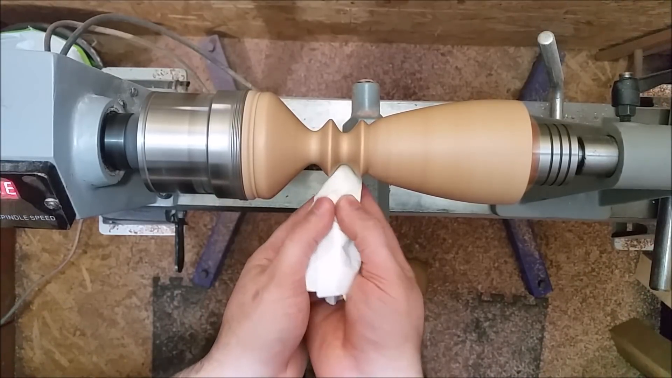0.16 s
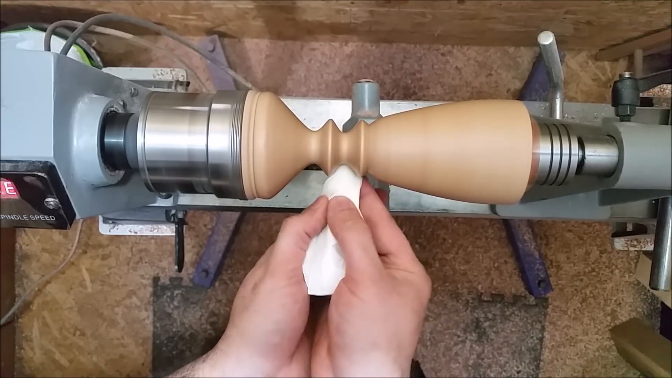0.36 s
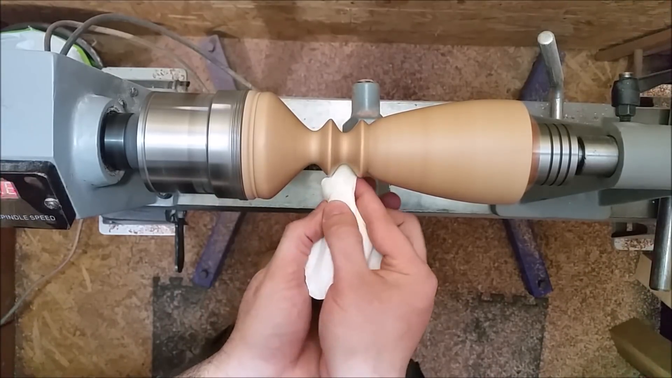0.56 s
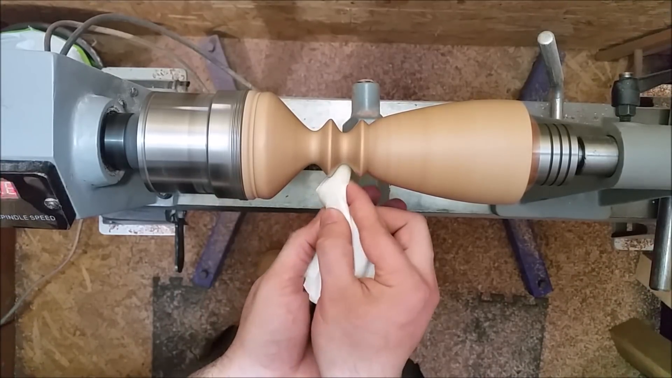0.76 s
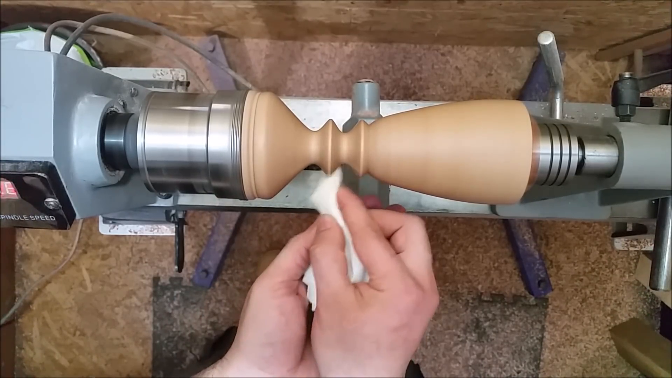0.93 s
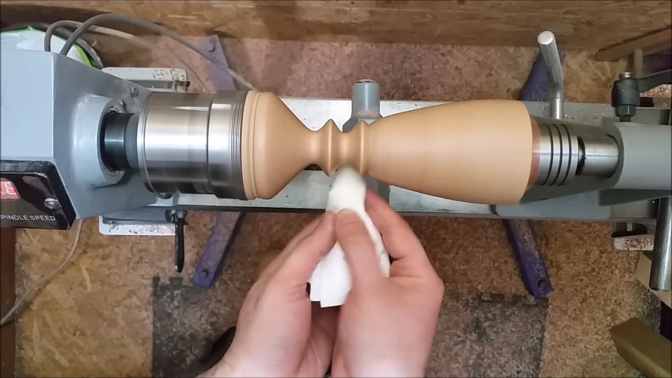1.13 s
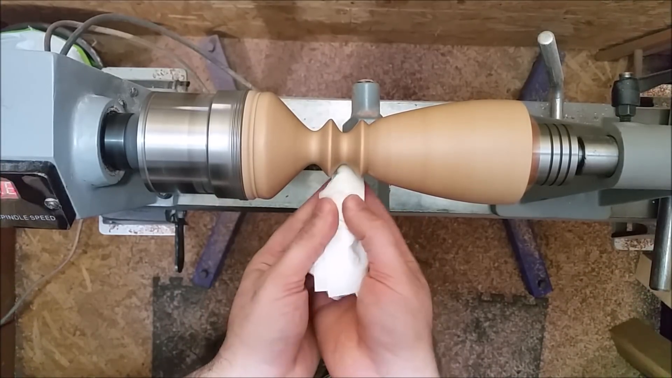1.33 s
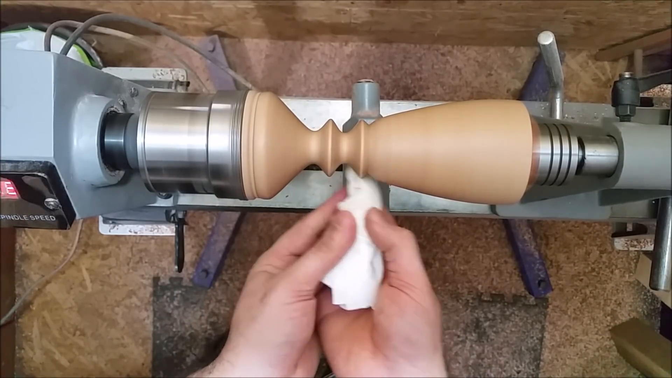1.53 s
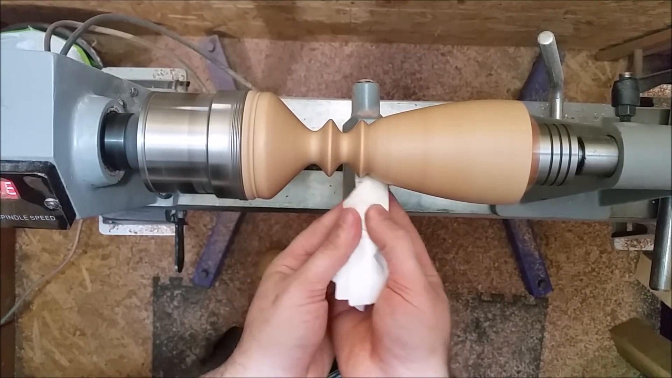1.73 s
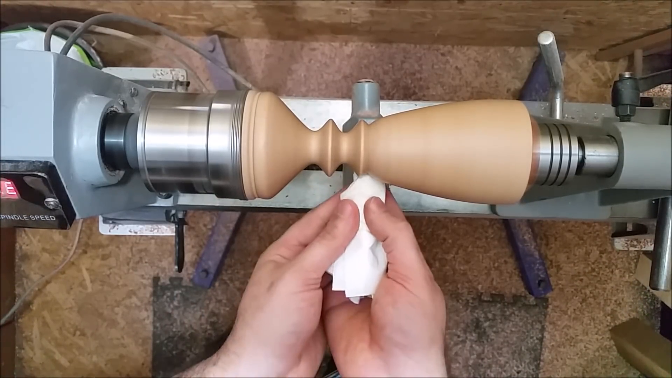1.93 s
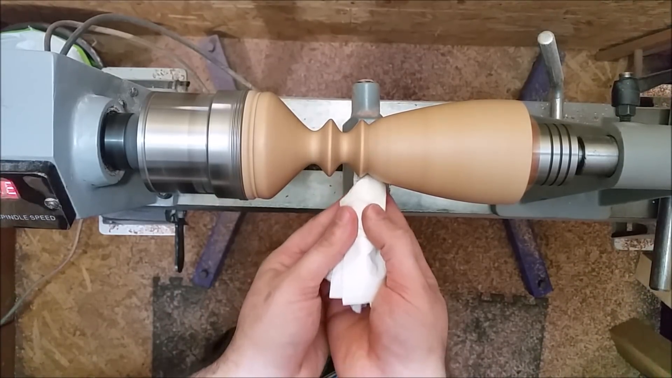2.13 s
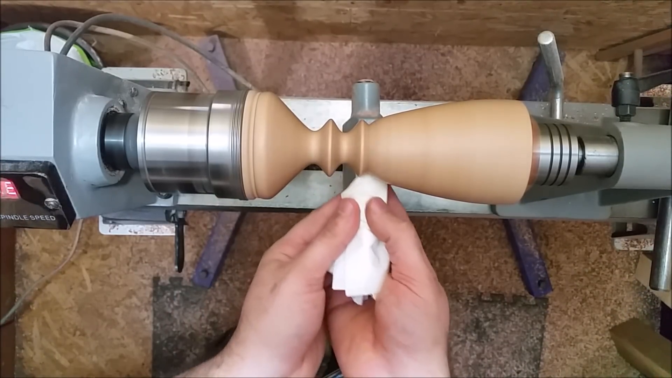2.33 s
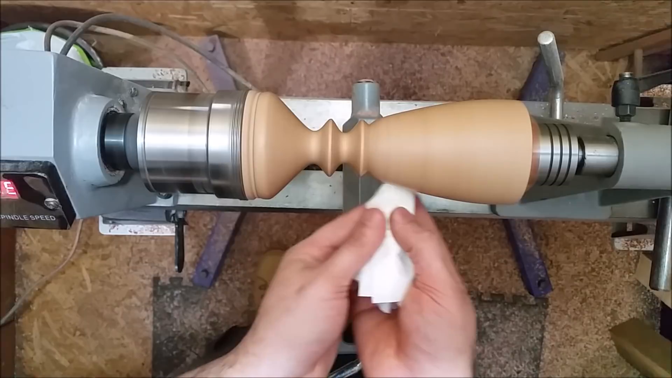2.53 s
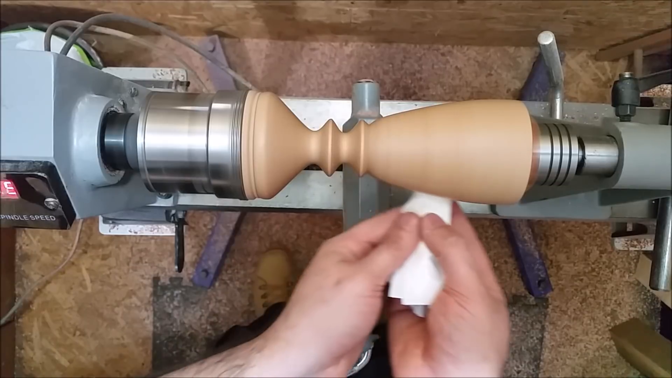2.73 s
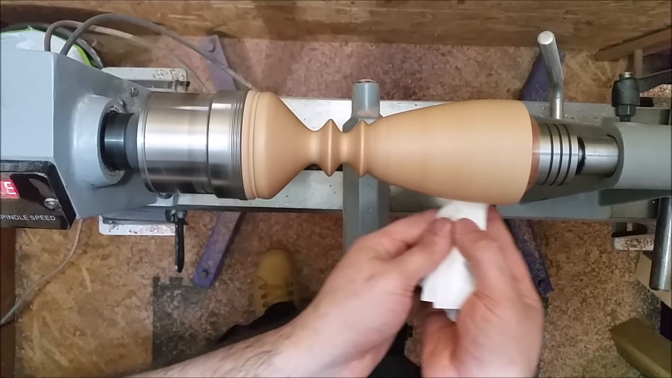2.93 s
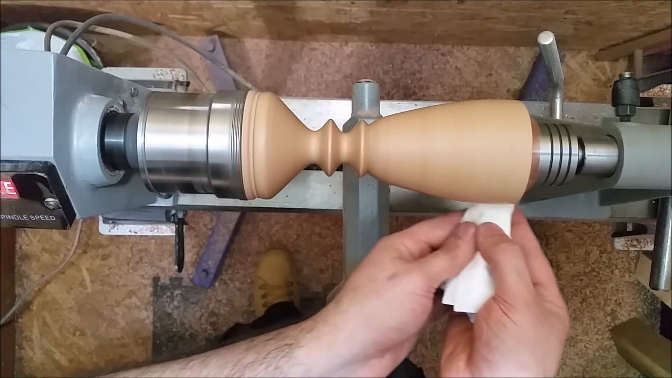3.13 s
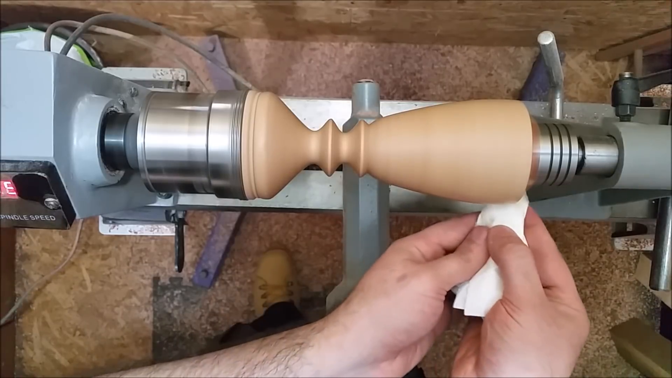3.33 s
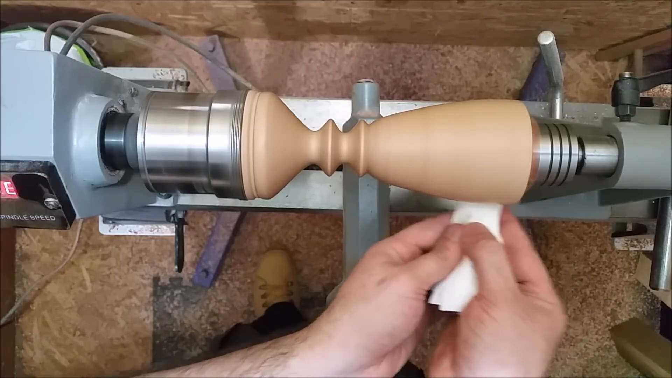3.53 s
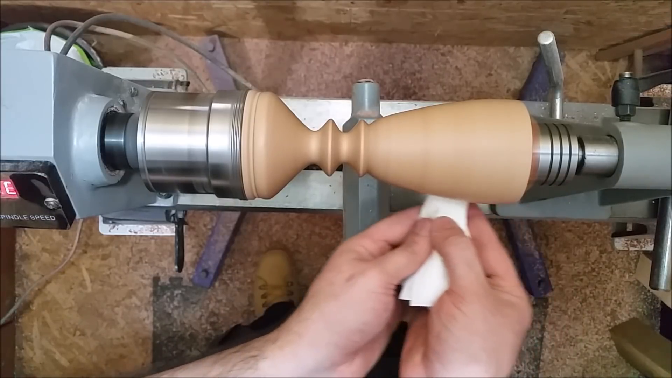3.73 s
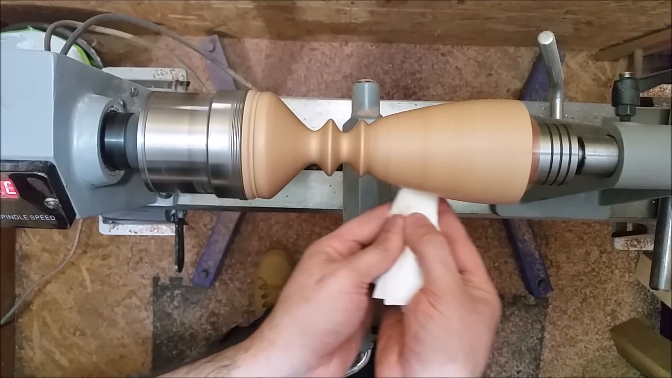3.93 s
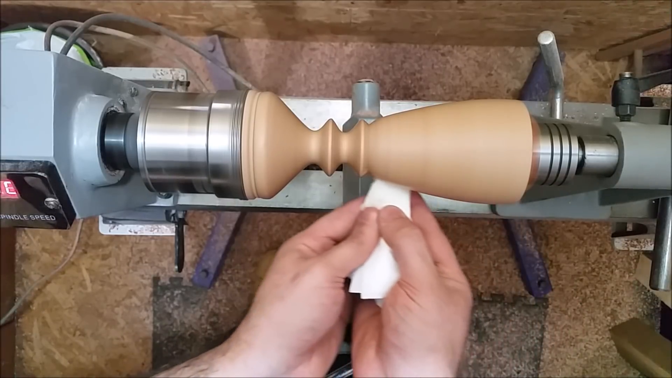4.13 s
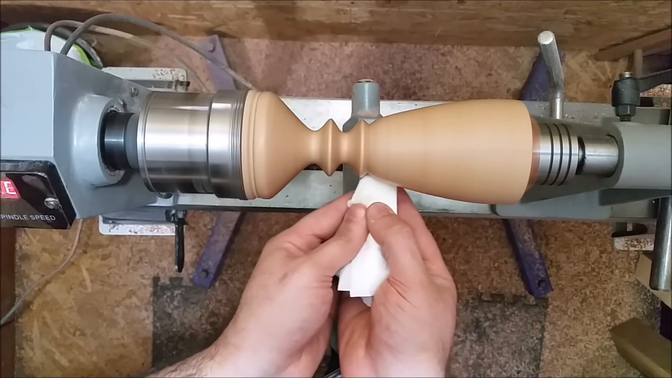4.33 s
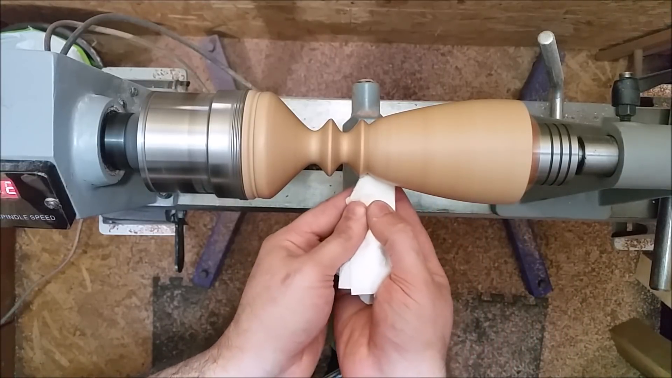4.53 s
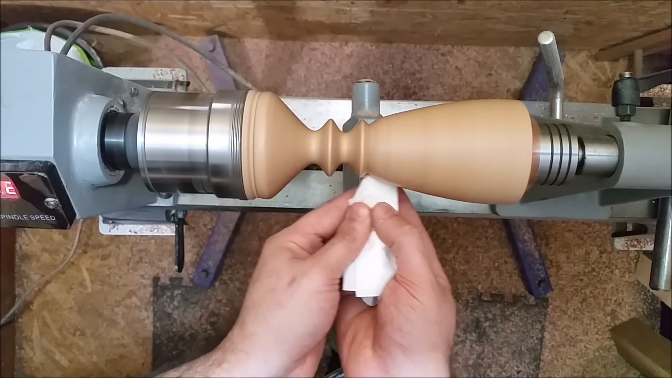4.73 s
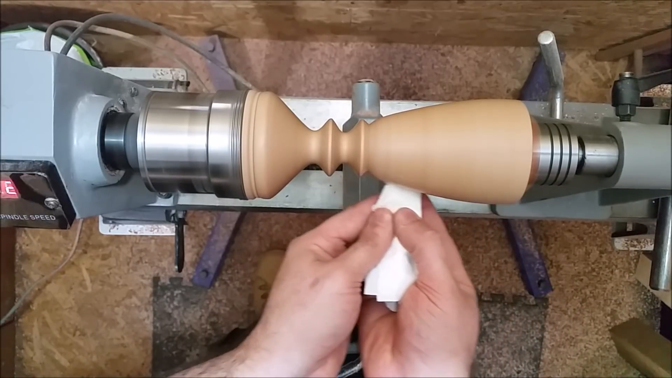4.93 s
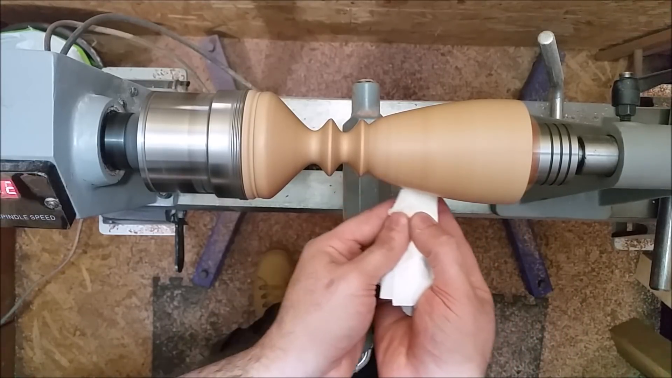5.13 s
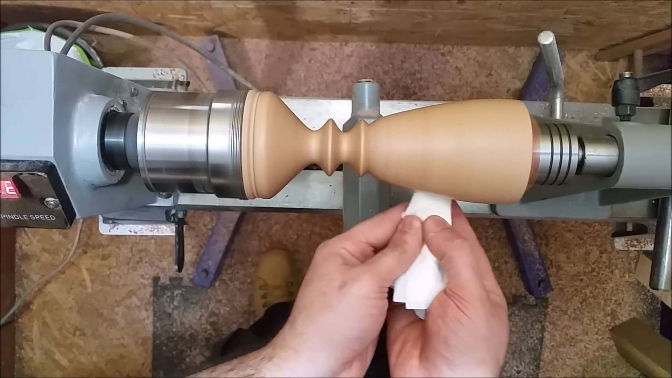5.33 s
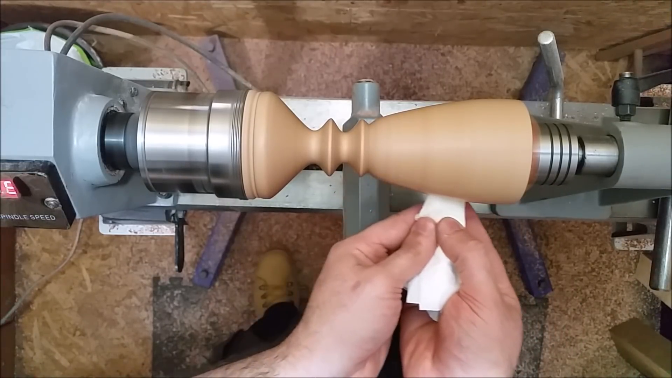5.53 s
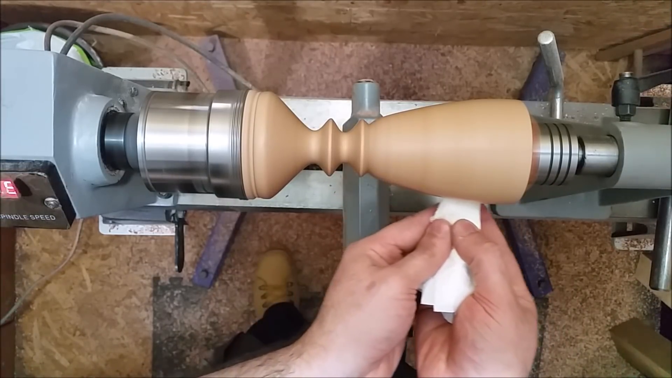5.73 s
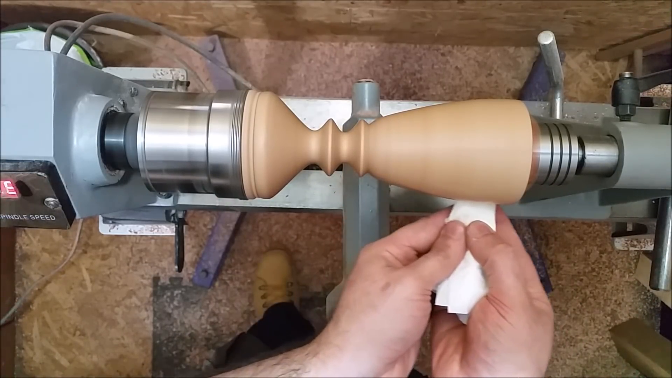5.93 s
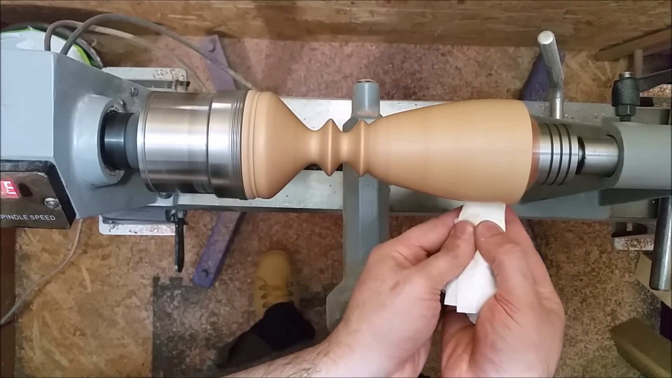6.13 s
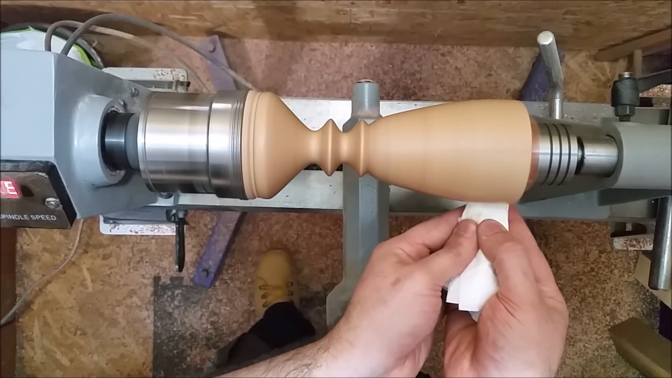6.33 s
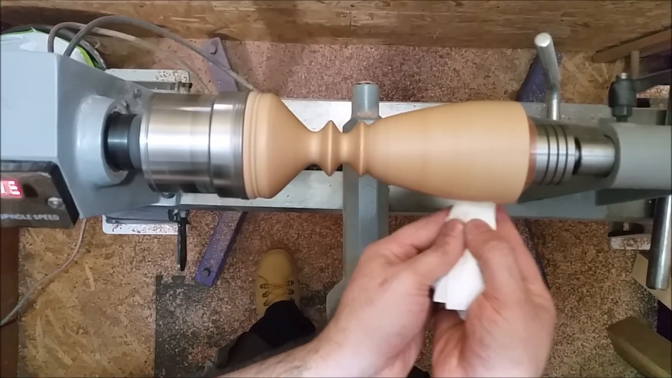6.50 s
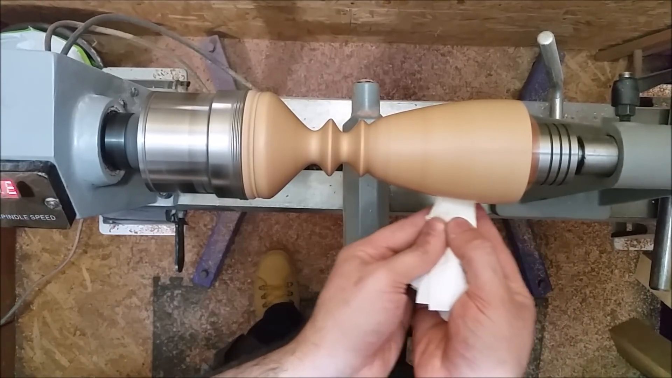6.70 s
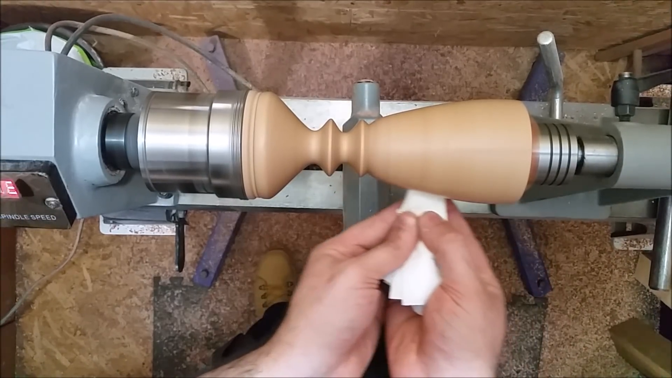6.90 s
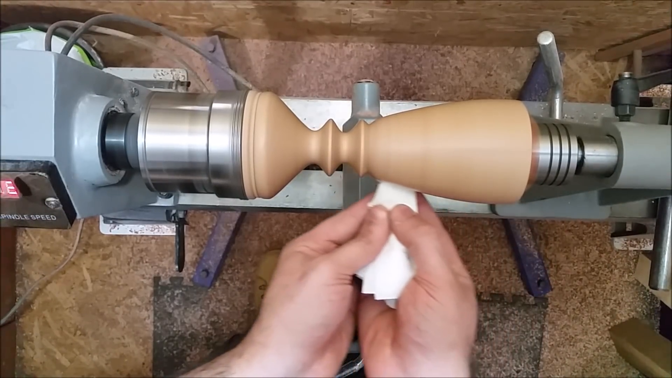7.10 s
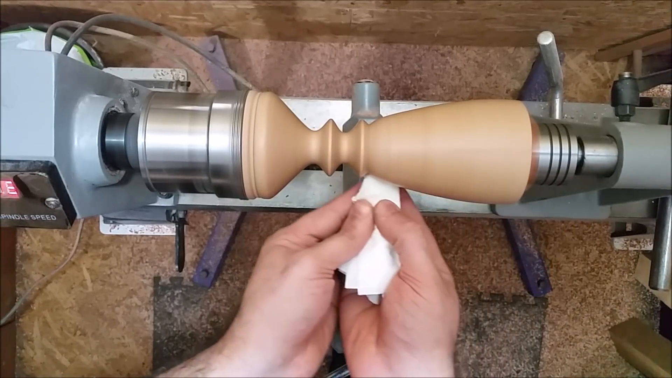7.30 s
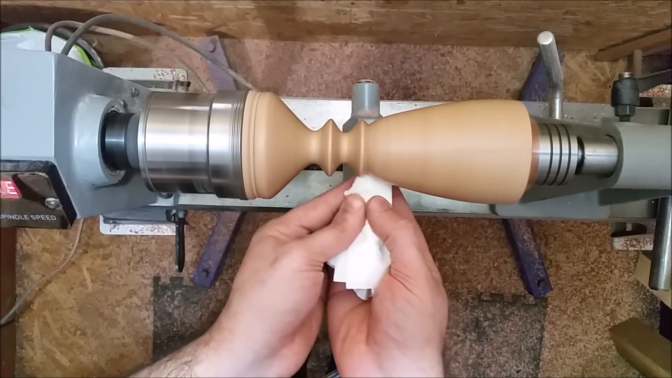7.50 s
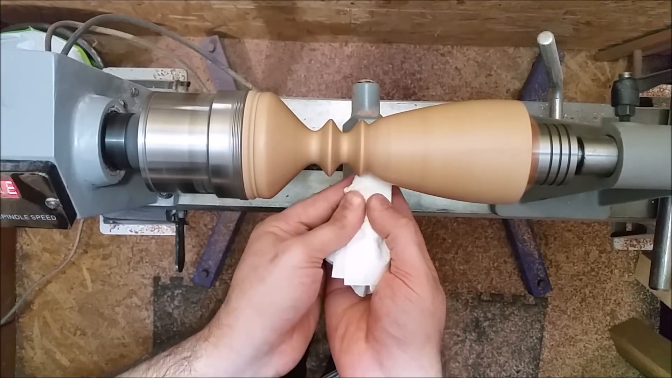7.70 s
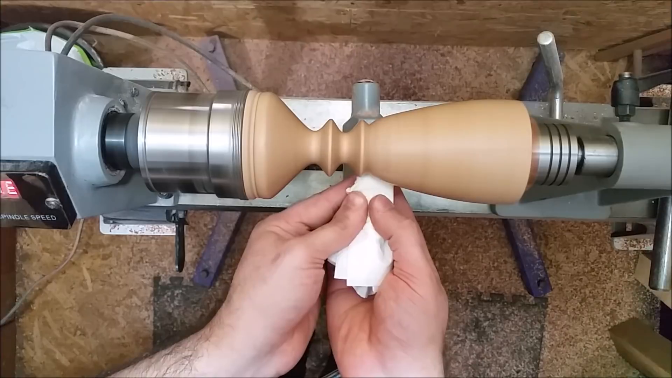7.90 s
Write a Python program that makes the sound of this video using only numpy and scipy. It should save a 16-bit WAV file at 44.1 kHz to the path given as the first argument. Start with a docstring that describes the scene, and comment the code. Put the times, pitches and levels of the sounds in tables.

```python
"""A wood lathe turns a vase in a small workshop while a paper towel is pressed against it.
Motor, spindle and belt are sums of wavering sines at their orders and combinations; load and chatter change
their levels. The inverter is a fixed whistle with sidebands, the bearings are whines over rumble.
The towel is coloured noise pulsing once per turn: rub, rasp, hiss and two brief scuffs.
Another motor coasts down faintly: three sinking sines."""
import sys
import numpy as np
from scipy import signal
from scipy.fft import rfft, irfft, next_fast_len
from scipy.io import wavfile

SR = 44100
rng = np.random.default_rng(int(sys.argv[2]) if len(sys.argv) > 2 else 0)


def wav_out(sig):
    """Save sig, one row per channel (or a flat mono array), as 16-bit PCM at SR to the path in sys.argv[1]."""
    wavfile.write(sys.argv[1], SR, np.round(np.clip(np.atleast_2d(sig).T, -1, 1) * 32767).astype(np.int16))


N = 351036

# sixth spindle order, the workpiece's drone: t/s, level/dB
DRONE_LEVEL = [(0, -39), (2.3, -34), (3, -26.5), (3.5, -22.5), (4.35, -33), (4.75, -27), (5.1, -33),
               (5.4, -26.5), (6, -27), (6.55, -20.5), (7.35, -31.5), (7.6, -26.5), (7.96, -27.5)]
# likeness of the two microphones: f/Hz, correlation (-1 to 1)
LIKENESS = [(30, .96), (90, .94), (180, .97), (330, .85), (600, .6), (1200, 0), (2400, -.35), (4500, .05),
            (6500, -.2), (9500, .1), (12500, -.3), (15000, -.2)]
# balance of the two microphones: f/Hz, left minus right/dB
BALANCE_DB = [(60, -1.5), (92, -4), (140, -2), (210, -0.5), (330, -6), (500, -2.5), (770, -2.5),
              (1170, -3.5), (1790, -4), (2740, -4.5), (4190, 4), (6410, 4), (9810, -5), (15000, 0.5)]


def drive(motor, spindle, load):
    """Motor and spindle orders and their sum and difference tones beat; the weaker ones throb with the belt."""
    # motor's third order: t/s, level/dB
    motor_hum = [(0, -27), (.5, -27), (1.3, -34.5), (2.1, -25.5), (2.8, -29), (3.5, -36.5), (4.15, -43.5),
                 (4.6, -28.5), (5, -30), (5.4, -42), (6, -63), (7.4, -29), (7.96, -34)]
    # other workpiece orders: spindle multiple (rounded for pitch), light/dB, loaded/dB, added by chatter/dB
    drone_orders = [(4, -58, -46.5, 14), (5, -66, -43.5, 6.5), (6.86, -51.5, -41, 4),
                    (7.65, -73, -47.5, 14), (9, -67, -68, 16), (10, -75, -53.5, 7), (11.1, -54.5, -59, 18),
                    (12, -76, -68, 11), (13, -73, -62.5, 11.5), (29, -79, -78, 15), (31, -86, -76, 13),
                    (60, -80, -75, 13.5)]
    # tones of the belt-coupled shafts: motor multiple, spindle multiple, light/dB, loaded/dB
    belt_tones = [(0, 1, -49, -52), (0, 3, -50, -58), (2, 0, -45, -45.5), (5, -2, -46.5, -53),
                  (6, -3, -49, -44.5), (3, 2, -39.5, -38.5), (6, -2, -44, -42), (5, 0, -41.5, -38),
                  (3, 3, -42, -42), (6, 0, -49, -46.5), (10, -3, -71, -62.5), (8, 0, -58, -55),
                  (9, 0, -64.5, -55.5), (10, -1, -61, -66), (12, 0, -65, -80), (0, 15, -70, -67),
                  (0, 16, -74, -64), (14, 0, -62.5, -60.5)]
    belt_laps_per_motor_turn = .087
    drone_smear_rad = .22

    motor_at, spindle_at = angle(motor), angle(spindle)
    motor_db, drone_db = in_time(motor_hum)[0], in_time(DRONE_LEVEL)[0]
    chattering = chatter()
    # the frame sings at a sum tone, in step with the motor's hum
    frame_db = motor_db + between(-27.5, -15, load)
    strong = [(3, 0, motor_db), (0, 6, drone_db), (6, 3, frame_db)]
    throb_depth = between(0.21, 0.07, load)
    throb = 1 + throb_depth * np.cos(belt_laps_per_motor_turn * motor_at)

    out = np.zeros((2, N))
    for m, s, level_db in strong:
        hz = m * motor.mean() + s * spindle.mean()
        out += tone(m * motor_at + s * spindle_at, level_db, hz, waver_db=1.0, smear_rad=0.072)
    for order, light_db, loaded_db, chatter_db in drone_orders:
        level_db = between(light_db, loaded_db, load) + chatter_db * chattering
        hz = order * spindle.mean()
        out += throb * tone(round(order) * spindle_at, level_db, hz, waver_db=1.8, smear_rad=drone_smear_rad)
    for m, s, light_db, loaded_db in belt_tones:
        hz = m * motor.mean() + s * spindle.mean()
        phase = round(m) * motor_at + round(s) * spindle_at
        level_db = between(light_db, loaded_db, load)
        out += throb * tone(phase, level_db, hz, waver_db=1.3, smear_rad=0.17)
    return out


def chatter():
    """Strength of the workpiece's chatter: one bout builds up, holds and dies away."""
    # start/s, length/s, strength (0-1); the row of strength 0 is silent
    bouts = [(3.005, 1.5, 0), (5.77, 0.99, 1.0)]
    attack_s, release_s = 0.18, 0.4
    t = np.arange(N) / SR
    out = np.zeros(N)
    for start_s, length_s, strength in bouts:
        rise = (t - start_s) / attack_s
        fall = 1 + (start_s + length_s - t) / release_s
        out += strength * np.clip(np.minimum(rise, fall), 0, 1)
    return out


def shoulder(spindle):
    """The tenth spindle order swells and fades as the towel crosses the shoulder of the vase."""
    # t/s, peak level/dB
    crossings = [(2.95, -50), (4.0, -46), (5.58, -39), (7.0, -45)]
    width_s = 0.22
    t = np.arange(N) / SR
    swell = sum(from_db(level_db) * np.exp(-((t - s) / width_s) ** 2) for s, level_db in crossings)
    return swell * tone(10 * angle(spindle), 0, 10 * spindle.mean(), waver_db=0.5, smear_rad=.15)


def inverter(motor):
    """A fixed switching whistle, with sidebands at four times the supply rate of the four-pole motor."""
    # t/s, level/dB
    whistle_level = [(0, -36.5), (1.4, -40.5), (2.8, -37.5), (3.5, -41.5), (4.2, -35.5), (5.2, -40),
                     (6.6, -35.5), (7.3, -42), (7.48, -46), (7.75, -33), (7.96, -39.5)]
    # left, then right microphone: gain/dB, slow waver/dB
    pickup = [(-8.0, 4), (-0.5, 0.5)]
    switching_hz, left_phase_rad = 12500.7, 2.44
    sideband_db, upper_re_lower_db = -19.0, -5.0
    flutter_db = 0.67

    carrier = angle(np.full(N, switching_hz)) + np.array([[left_phase_rad], [0]])
    # the supply rate follows the loaded motor only in part
    supply_hz = 88 + (motor - 44) / 2
    ripple = 4 * angle(supply_hz)
    lower = np.sin(carrier - ripple)
    upper = from_db(upper_re_lower_db) * np.sin(carrier + ripple)
    sidebands = from_db(sideband_db) * (lower + upper)
    # it wavers slowly and flutters faintly by chance, separately at each microphone
    sides_db = np.array([db + waver_db * drift(1.75) + flutter_db * drift(43.0) for db, waver_db in pickup])
    level_db = in_time(whistle_level)[0] + sides_db
    return np.sqrt(2) * from_db(level_db) * (np.sin(carrier) + sidebands)


def bearings(motor, load):
    """Rolling balls give faint, unsteady whines over the rumble of the cast bed."""
    # f/Hz, relative density/dB
    rumble_colour = [(15, -25), (24, -5), (33, 5), (52, -4.5), (80, 1.5), (115, 2), (145, -8.5), (210, -5),
                     (265, -15.5), (330, -12.5), (390, -17), (450, -36.5)]
    # motor multiple, light/dB, loaded/dB
    whines = [(13.33, -62, -61), (22.3, -75, -74), (24.41, -60, -66.5), (32.7, -78, -70), (41.2, -73, -66),
              (43.8, -61, -64.5), (52, -65, -83), (57.6, -57, -72), (59.5, -71, -68), (64.6, -69, -76),
              (69.8, -71, -61.5), (75, -73, -89), (88.5, -65, -70), (91, -85, -62), (118.3, -67, -75),
              (223, -64, -65)]
    rumble_db = -37.5
    motor_at = angle(motor)
    out = from_db(rumble_db + 0.43 * drift(1.8)) * noise(rumble_colour)
    for order, light_db, loaded_db in whines:
        slip_rad = 0.012 * order * drift(16.0)
        level_db = between(light_db, loaded_db, load)
        out += tone(order * motor_at + slip_rad, level_db, order * motor.mean(), waver_db=3.0, smear_rad=0.42)
    return out


def towel(spindle):
    """Paper slides over the grain: noise pulsing a little once per turn; rasp and hiss also flutter."""
    # level ahead of the hiss gain: t/s, level/dB
    hiss_level = [(0.0, -49), (0.15, -51), (0.33, -46.5), (0.42, -49), (0.71, -45.5), (1.22, -54.5),
                  (1.39, -49.5), (1.84, -52), (1.99, -46.5), (2.61, -52), (2.81, -47.5), (3.9, -50.5),
                  (4.15, -48), (4.54, -51.5), (5.34, -47.5), (6.65, -49.5), (6.8, -49), (7.96, -49)]
    # colours of the three noises: f/Hz, relative density/dB
    rub_colour = [(330, -24), (430, -4.5), (490, -2.5), (530, -2.5), (560, 5.5), (590, 2.5), (640, -0.5),
                  (800, -3.5), (960, -5.5), (1060, 1), (1180, -24), (1500, -23)]
    rasp_colour = [(800, -28), (1150, -2), (1300, 1.5), (1800, 1), (2100, -1), (2650, 3), (3100, -1.5),
                   (3450, -1.5), (3900, 1), (4300, -1), (4900, 1), (5600, -3), (7000, -10)]
    hiss_colour = [(4800, -41), (6000, -4.5), (7000, -2), (7800, -4.5), (9200, 1), (10500, 0),
                   (12000, -0.5), (13000, 0.5), (14000, -8.5), (15700, -4.5)]
    rub_mean_db, rasp_mean_db, hiss_gain_db = -52, -44.5, 4.5
    rub_follows_drone, rasp_follows_hiss = 0.16, .1  # shares of the dB swing

    drone_db, hiss_db = in_time(DRONE_LEVEL)[0], in_time(hiss_level)[0]
    rub_db = rub_mean_db + rub_follows_drone * (drone_db - drone_db.mean())
    rasp_db = rasp_mean_db + rasp_follows_hiss * (hiss_db - hiss_db.mean())
    turn = np.cos(angle(spindle))
    flutter_db = 0.81 * drift(8.7)
    rub = from_db(rub_db + 0.41 * turn) * noise(rub_colour)
    rasp = from_db(rasp_db + 0.36 * turn + 0.86 * flutter_db) * noise(rasp_colour)
    hiss = from_db(hiss_db + hiss_gain_db + 0.33 * turn + flutter_db) * noise(hiss_colour)
    # reflections comb the middle of the spectrum; the low rub and fine hiss are heard directly
    return rub + workshop(rasp) + hiss


def scuffs():
    """The towel catches and gives a short, narrow rasp: band-passed noise under a bell-shaped swell."""
    # centre t/s, bell width/s, f/Hz, level/dB
    catches = [(2.85, .12, 1450, -55), (3.53, .028, 1340, -44.5)]
    half_width_hz = 190
    t, out = np.arange(N) / SR, np.zeros((2, N))
    for s, width_s, hz, level_db in catches:
        edges_hz = [hz - half_width_hz, hz + half_width_hz]
        band = signal.butter(2, edges_hz, "band", fs=SR, output="sos")
        rasp = rms_one(signal.sosfilt(band, rng.standard_normal((2, N))))
        out += from_db(level_db) * np.exp(-((t - s) / width_s) ** 2) * rasp
    return out


def coasting_motor():
    """Another motor's first three orders sink in pitch and swell as they pass through room resonances."""
    # orders 1-3 ahead of the room: level/dB
    orders_db = [-40.5, -35, -40]
    # how the room carries them: f/Hz, gain/dB
    room_colour = [(35, -17), (72, -28), (84, -12), (93, -9), (99, -16.5), (106, 0.5), (110, -6), (116, -1),
                   (123, 1), (130, -1.5), (137, -3), (144, -18)]
    start_turns_per_s, slowing_s = 48.2, 17.0
    turns_per_s = start_turns_per_s * np.exp(-np.arange(N) / SR / slowing_s)
    out = np.zeros((2, N))
    for k, order_db in enumerate(orders_db, 1):
        hz = k * turns_per_s
        level_db = order_db + at_hz(room_colour, hz)
        out += tone(k * angle(turns_per_s), level_db, hz.mean(), waver_db=3.0, smear_rad=0.26)
    return out


def workshop(x):
    """Bench and near walls add a short, dense tail, different at each microphone; the level is kept."""
    t60_s, tail_db = .16, -7.0
    t = np.arange(SR // 4) / SR
    tail = rng.standard_normal((2, len(t))) * from_db(-60 * t / t60_s)
    tail *= from_db(tail_db) / np.sqrt(np.sum(tail ** 2, axis=1, keepdims=True))
    wet = signal.fftconvolve(x, tail, axes=1)[:, :N]
    return (x + wet) / np.sqrt(1 + from_db(tail_db) ** 2)


def tone(phase, level_db, hz, waver_db, smear_rad):
    """A sine of this rms level, wavering in level and phase; treble reaches the microphones out of step."""
    phase = phase + rng.uniform(0, 2 * np.pi) + smear_rad * drift(6.2)
    apart_rad = np.arccos(np.clip(at_hz(LIKENESS, hz), -1, 1))
    sides = np.array([[.5], [-.5]])
    gain = np.sqrt(2) * from_db(level_db + waver_db * drift(3.43))
    return gain * from_db(sides * at_hz(BALANCE_DB, hz)) * np.sin(phase + sides * apart_rad)


def noise(colour):
    """Stereo noise of rms 1 with this colour, steep outside its ends."""
    size = next_fast_len(N)
    hz = np.arange(size // 2 + 1) * SR / size
    mid, side = rfft(rng.standard_normal((2, size)))
    alike = np.clip(at_hz(LIKENESS, hz), -1, 1)
    sides = np.array([[1], [-1]])
    both = np.sqrt(1 + alike) * mid + sides * np.sqrt(1 - alike) * side
    above = 1 + (hz / colour[-1][0] / 1.2) ** 8
    below = 1 + (colour[0][0] / (hz + 1)) ** 8
    skirt = 1 / np.sqrt(above * below)
    shape_db = at_hz(colour, hz) + sides * at_hz(BALANCE_DB, hz) / 2
    return rms_one(irfft(both * skirt * from_db(shape_db), size)[:, :N])


def drift(rate_hz):
    """Slow chance of spread 1: noise low-passed at this rate, computed every 100 samples."""
    r = np.exp(-200 * np.pi * rate_hz / SR)
    slow = signal.lfilter([1], [1, -2 * r, r * r], rng.standard_normal(N // 100 + 1002))[1000:]
    return np.interp(np.arange(N) / 100, np.arange(len(slow)), rms_one(slow))


def angle(per_s):
    """Running angle in radians of something that turns at this rate."""
    return 2 * np.pi * np.cumsum(per_s) / SR


def between(light, loaded, load):
    """Blend from the light-running value to the loaded one."""
    return light + load * (loaded - light)


def in_time(rows):
    """Each column of a curve at every sample."""
    s, *columns = np.transpose(rows)
    return [np.interp(np.arange(N) / SR, s, c) for c in columns]


def at_hz(points, hz):
    """Read a spectrum on a log-frequency axis."""
    points = np.array(points)
    return np.interp(np.log(hz + 1e-9), np.log(points[:, 0]), points[:, 1])


def from_db(db):
    """Decibels to gain."""
    return 10 ** (np.asarray(db) / 20)


def rms_one(x):
    """Scale to rms 1."""
    return x / np.sqrt(np.mean(x ** 2) + 1e-20)


def scene():
    """The running lathe, the towel on the workpiece and the other motor."""
    # the motor sags as the towel drags: t/s, speed/(turns per s)
    motor_speed = [(0, 42.7), (1.3, 43.6), (2, 43.35), (2.7, 42.7), (3.15, 42.1), (3.5, 42.7), (3.9, 41.75),
                   (4.3, 41.7), (4.7, 42.2), (5.4, 41.6), (6.2, 41.55), (6.6, 41.9), (7, 41.75),
                   (7.96, 42.5)]
    # the towel moves from the narrow stem onto the wide body: t/s, load (0-1)
    towel_load = [(0, 0), (2.45, 0), (3.05, 1), (7.96, 1)]
    motor_turns_per_spindle_turn = 1.378
    motor, load = in_time(motor_speed)[0], in_time(towel_load)[0]
    spindle = motor / motor_turns_per_spindle_turn
    lathe = drive(motor, spindle, load) + shoulder(spindle) + inverter(motor) + bearings(motor, load)
    return lathe + towel(spindle) + scuffs() + coasting_motor()


def record(dry):
    """The top is cut steeply."""
    cutoff_hz = 15750
    return signal.sosfilt(signal.ellip(12, .1, 80, cutoff_hz, fs=SR, output="sos"), dry)


dry = scene()
out = record(dry)
wav_out(out)
```